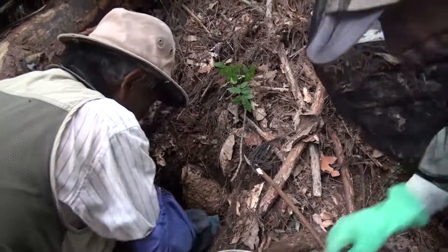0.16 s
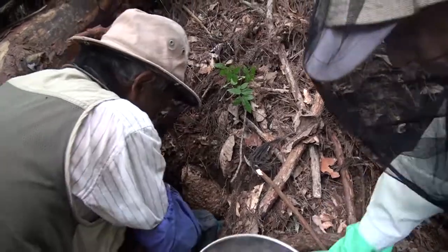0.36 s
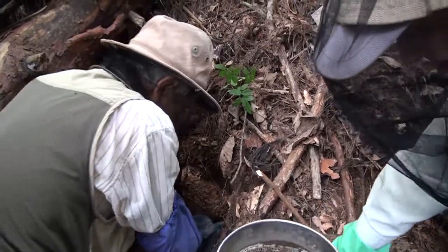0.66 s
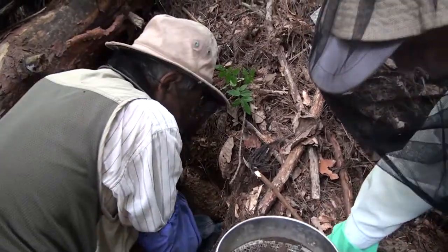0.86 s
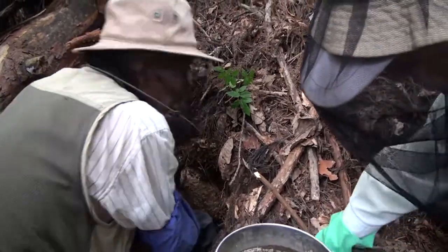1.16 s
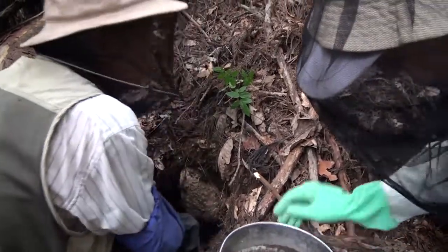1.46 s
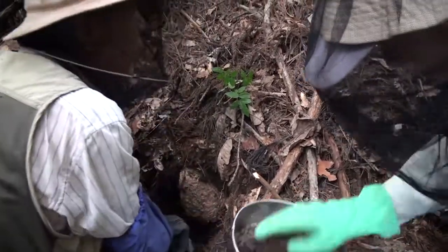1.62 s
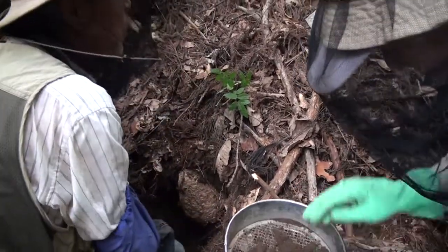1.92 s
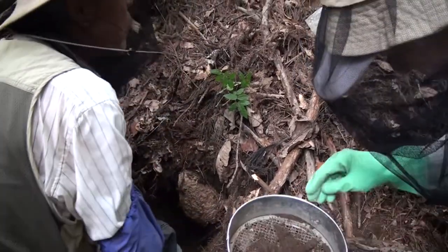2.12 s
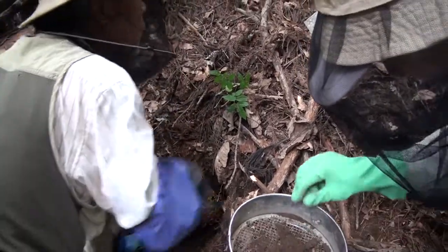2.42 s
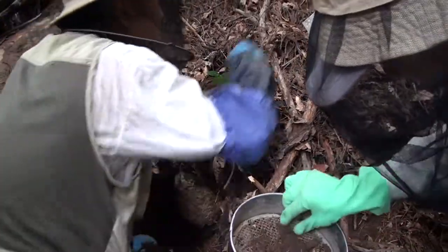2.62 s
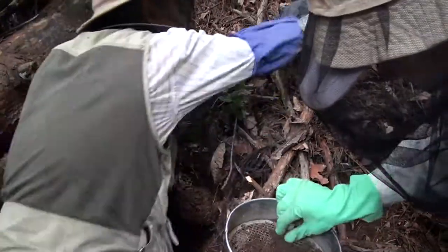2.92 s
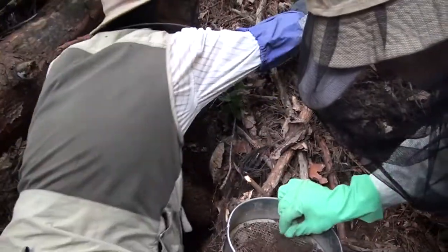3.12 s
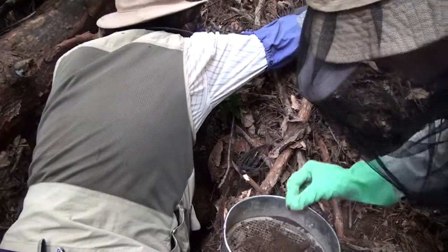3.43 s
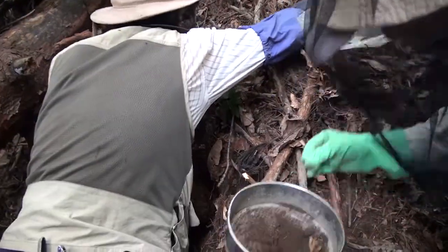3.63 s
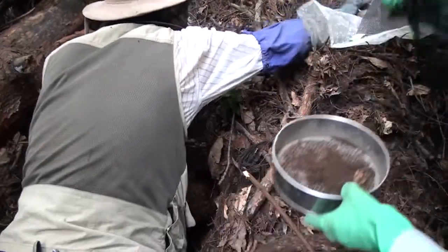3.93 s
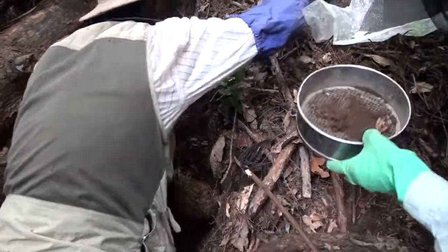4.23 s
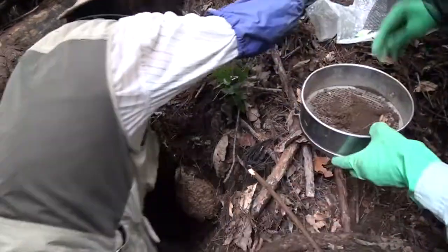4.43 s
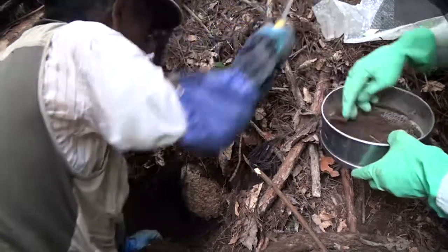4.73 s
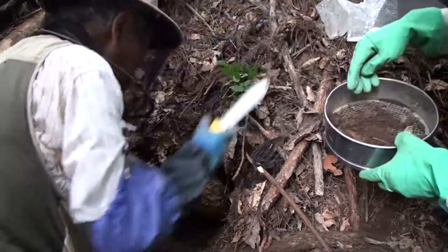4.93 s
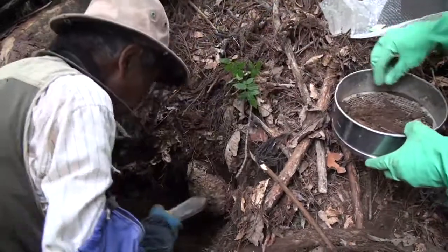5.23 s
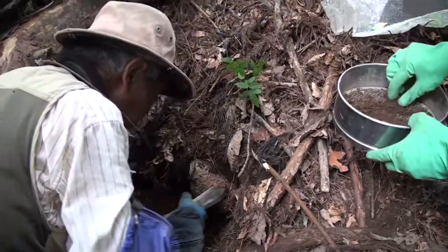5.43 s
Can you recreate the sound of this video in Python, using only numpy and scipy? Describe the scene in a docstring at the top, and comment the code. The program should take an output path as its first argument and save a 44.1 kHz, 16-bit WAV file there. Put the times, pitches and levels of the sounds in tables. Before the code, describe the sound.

A close outdoor scene of soil being sifted in a forest, over a soft steady rush and a very faint low drone. At about 0.2 s a metal sieve is knocked with a short bright clank, and more rattling knocks follow at 0.3-0.4 s. Dense, gritty soil hisses and crackles over the mesh, strongest around 0.3-0.7 s, with sharp twig and leaf snaps, thinning by 1.2 s. Dry sticks tock at 1.3 and 1.6 s. A second spill of grit swells from 1.7 to 2.3 s, with scattered snaps. From 2.5 to 3.8 s it is quieter: light sifting, sleeve rustle, dull clod pats. A brushing stroke comes near 3.9 s, faint rubs at 4.0-4.5 s. Around 4.6-4.8 s, litter rustles, a damped blade taps, a low thud lands and the sieve clinks. Grit trickles on, with a last stick tock at 5.3 s.

```python
"""Dry leaf litter on a forest floor, worked close to the microphone under a steady soft rush and a low far drone.
Noise bursts and ringing modes knock a metal sieve early on; dense random grains hiss as gritty soil on its mesh.
Filtered bursts snap twigs and leaves and grains rustle as sleeves throughout; dry sticks tock and clods pat down.
Late on, narrow noise rasps as rubs, a damped blade taps, a sinking sine thuds and the sieve clinks again.
"""
import sys
import numpy as np
from scipy import signal
from scipy.fft import rfft, irfft, next_fast_len
from scipy.io import wavfile
from scipy.ndimage import map_coordinates

SR = 44100
rng = np.random.default_rng(int(sys.argv[2]) if len(sys.argv) > 2 else 0)


def put_to_file(sound):
    """Save the sound as 16-bit audio at rate SR, in the file named by the first command-line argument."""
    columns = np.atleast_2d(sound).T  # one column per channel
    safe = np.clip(columns, -1, 1)
    whole_steps = np.round(safe * 32767)
    wavfile.write(sys.argv[1], SR, whole_steps.astype(np.int16))


N = 245328


def amp(db):
    """Decibels to gain."""
    return 10 ** (np.asarray(db) / 20)


def unit(x):
    """Scale to rms 1."""
    return x / np.sqrt(np.mean(x ** 2) + 1e-20)


def curves(rows):
    """One value per sample for each column after the time."""
    s, *cols = np.transpose(rows)
    return [np.interp(np.arange(N) / SR, s, c) for c in cols]


def wobble(rate):
    """A smooth random curve, rate knots a second."""
    knots = rng.standard_normal(int(N * rate / SR) + 4)
    return map_coordinates(knots, [np.arange(N) * rate / SR])


def coloured(x, points):
    """x through a causal minimum-phase filter whose gain follows the (frequency [Hz], gain [dB]) points."""
    size = 2 * next_fast_len(x.shape[-1] // 2 + 2048)
    hz, db = np.transpose(points)
    bins_hz = np.fft.rfftfreq(size, 1 / SR) + 1
    gain_db = np.interp(np.log(bins_hz), np.log(hz), db)
    cepstrum = irfft(np.log(amp(gain_db)))
    # folding the cepstrum forward makes the filter causal
    cepstrum[1:size // 2] *= 2
    cepstrum[size // 2 + 1:] = 0
    return irfft(rfft(x, size) * np.exp(rfft(cepstrum)), size)[..., :x.shape[-1]]


def resonant(x, hz, q):
    """x through one resonance."""
    hz = min(hz, SR / 3)
    return signal.lfilter(*signal.iirpeak(hz, max(q, 3 * hz / SR), SR), x)


def add(track, s, x):
    """Mix x into the track from time s."""
    part = track[max(round(s * SR), 0):][:len(x)]
    part += x[:len(part)]


def swell(s, width):
    """A smooth bell-shaped rise and fall around time s."""
    return np.exp(-((np.arange(N) / SR - s) / width) ** 2 / 2)


def movement(start, rise, hold, release):
    """Gain of one hand movement: it gathers force, sags slowly while it lasts, then dies away."""
    sag_db_per_s = 6.5
    t = np.arange(N) / SR - start
    sag_db = sag_db_per_s * np.clip(t - rise, 0, hold)
    release_db = 60 * np.maximum(t - rise - hold, 0) / release
    return np.clip(t / rise, 0, 1) * amp(-sag_db - release_db)


def grains(rate, spread_db, life):
    """Tiny random impacts, rate a second, of uneven strength: each is a noise burst that falls 60 dB in its life."""
    sizes = amp(spread_db * np.minimum(rng.exponential(size=N), 4))
    impacts = (rng.random(N) < rate / SR) * sizes ** 2
    energy = signal.lfilter([1], [1, -amp(-120 / (life * SR))], impacts / rate)
    return unit(np.sqrt(energy) * rng.standard_normal(N))


def ticks(rate, centre_hz, cycles, spread_db):
    """Crumbs or leaf flakes, rate a second: each rings for a few cycles at a pitch of its own."""
    chance = rng.random((int(rate * N / SR), 4))
    t = np.arange(SR // 100) / SR
    hz = centre_hz * 2 ** (chance[:, :1] - chance[:, 3:])  # within an octave either way
    size = amp(spread_db * np.minimum(-np.log(1 - chance[:, 1:2]), 3.5))
    rings = size * np.sin(2 * np.pi * hz * t) * amp(-60 * hz * t / cycles)
    places = (chance[:, 2:3] * N).astype(int) + np.arange(len(t))
    return unit(np.bincount(places.ravel(), rings.ravel(), N)[:N])


def forest():
    """A soft steady rush with a low, uneven drone far off; its middle range is slightly wide."""
    # tone of the forest air: (frequency [Hz], relative gain [dB])
    air_tone = [(20, -29), (45, -22), (80, -14), (120, -5.5), (180, -4), (340, -3.5), (530, -6.5),
                (1100, -7.5), (1900, -9), (3000, -13.5), (6900, -15.5), (9000, -15), (11800, -18.5),
                (13000, -61)]
    side_tone = [(60, -30), (300, 1.0), (700, 1.0), (1200, 0.0), (2000, -5.5), (4000, -7.0), (10000, -56.0)]
    air = unit(coloured(rng.standard_normal(N), air_tone))
    drone = unit(resonant(resonant(rng.standard_normal(N), 123.0, q=7.4), 123.0, q=7.4))
    side = unit(coloured(rng.standard_normal(N), side_tone))
    left_right = np.array([[1], [-1]])
    return amp(-52.5) * air + amp(-69.0) * drone + amp(-63.5) * side * left_right


def rumble():
    """A faint low rumble, noise through a broad resonance, comes and goes."""
    # mean level of the rumble, ahead of its wobble: (time [s], level [dB])
    rumble_levels = [(0, -70), (.9, -75), (1.3, -66), (2.1, -70), (3.1, -64.5), (3.6, -69), (4.0, -62.5),
                     (4.7, -59), (5.5, -68)]
    level_db, = curves(rumble_levels)
    low_noise = unit(resonant(resonant(rng.standard_normal(N), 70, q=1.9), 70, q=1.9))
    return amp(level_db + 2 * wobble(11)) * low_noise


def ground_echo(x, t60):
    """Trunks and ground scatter a short answer from the sides, opposite in the two channels."""
    tone = [(100, -11.0), (500, -12.0), (2200, 25.5), (4500, 16), (8500, 5), (12000, -18)]
    t = np.arange(SR // 4) / SR
    tail = coloured(rng.standard_normal(len(t)) * amp(-60 * t / t60), tone)
    left_right = np.array([[1], [-1]])
    return signal.fftconvolve(x, tail / np.linalg.norm(tail))[:N] * left_right


def clods():
    """A lump of earth lands on soft ground with a dull, toneless pat of noise."""
    # clods dropping: (time [s], starting level [dB], t60 [s])
    drops = [(0.553, -43, .06), (2.24, -48.5, 0.11), (2.905, -49, 0.046), (3.062, -45, .05),
             (3.22, -46, 0.052), (3.41, -47, 0.055), (3.4856, -43, 0.039), (3.712, -46, .05),
             (3.992, -42, .06)]
    tone = [(100, -21), (330, 3), (800, -4), (1600, -7), (4000, -40)]
    out, t = np.zeros(N), np.arange(SR // 10) / SR
    for s, db, t60 in drops:
        pat = unit(coloured(rng.standard_normal(len(t)), tone))
        add(out, s, amp(db - 60 * t / t60) * pat)
    return out


def bump():
    """A weight settles on the soft ground: a thud whose pitch sinks."""
    pitch_hz = np.interp(np.arange(N) / SR, [4.675, 4.72], [148, 108])
    thud = np.sin(2 * np.pi * np.cumsum(pitch_hz) / SR)
    return amp(-34.0) * swell(4.695, 0.016) * thud


def rubs():
    """Sliding contacts of blade, gloves and sleeves give short, narrow rasps of noise."""
    # brief rubs: (time of the peak [s], level [dB], centre [Hz], width of the bell [s])
    contacts = [(4, -57, 980, 0.012), (4.27, -58, 230, 0.054), (4.38, -56, 314, 0.052),
                (4.4, -55, 1000, 0.012), (4.495, -53, 213, 0.01)]
    out = np.zeros(N)
    for s, db, hz, width in contacts:
        rasp = unit(resonant(resonant(rng.standard_normal(N), hz, q=8.9), hz, q=8.7))
        out += amp(db) * swell(s, width) * rasp
    return out


def sticks():
    """A dry stick gives a hollow tock: a sharp crack with two quickly damped bending modes."""
    # knocks of dry sticks:
    # (time [s], level [dB], lower mode [Hz], upper mode [Hz], upper over lower mode [dB], t60 of the modes [s])
    tocks = [(1.3385, -38.5, 1540, 2720, 1, .022), (1.5891, -36, 2250, 2960, 2, 0.028),
             (5.2957, -36.5, 1730, 2850, 0.5, 0.032)]
    crack_tone = [(200, -10), (750, -3), (1400, -8), (3500, 0), (6000, -8), (12000, -20)]
    out, t = np.zeros(N), np.arange(SR // 12) / SR
    for s, db, low_hz, high_hz, high_db, t60 in tocks:
        modes = np.sin(2 * np.pi * low_hz * t) + amp(high_db) * np.sin(2 * np.pi * high_hz * t)
        crack = unit(coloured(rng.standard_normal(len(t)), crack_tone))
        tock = modes * amp(-60 * t / t60) + amp(1 - 60 * t / 0.021) * crack
        add(out, s, amp(db) * tock)
    return out


def snaps():
    """A brittle break: a thin click, a short splintering with a damped ping, and the knock of the twig's body."""
    # snapping twigs, leaves and pebbles:
    # (time [s], level [dB], centre [Hz], woody body ahead of a 2 dB cut [dB], t60 [s])
    breaks = [(0.292, -31.5, 8900, -6, 0.024), (0.3502, -33, 6450, 1, 0.034),
              (0.3567, -30, 6100, -5, 0.015), (0.3817, -29, 8200, -16, .01),
              (0.4083, -29.5, 5600, -10, 0.014), (0.4168, -32, 6000, -12, .015),
              (0.4385, -21.5, 7140, -10, 0.02), (0.4533, -29, 8500, -17, 0.023),
              (0.5972, -34, 7500, -20, .006), (0.6172, -31, 7000, -20, .008), (0.6537, -33, 5870, -6, .02),
              (0.6828, -39, 7300, -14, .015), (0.6895, -29, 6700, -18, 0.0068),
              (0.7309, -34, 8600, -24, .008), (0.7472, -39, 7700, -20, .008),
              (0.7766, -37, 6700, -5, 0.015), (0.8416, -32, 6060, -8.5, 0.044),
              (0.8641, -38, 5900, -22, .01), (0.8742, -33.5, 7260, -21, .012), (0.891, -32, 8800, -7, .014),
              (0.9252, -35, 7700, -24, 0.019), (0.9752, -37, 6300, -19, .015),
              (0.9176, -38.5, 7500, -20, .008), (0.9415, -38, 8400, -6, .015),
              (0.9979, -40, 6600, -22, 0.0073), (1.161, -40, 7250, -9, 0.0088),
              (1.335, -44, 7040, -9, 0.046), (1.3427, -41.5, 7600, -12, 0.028),
              (1.3565, -38.5, 1730, -10, 0.012), (1.370, -42, 8800, -26, .018),
              (1.578, -44, 8550, -10, 0.074), (1.5892, -40, 8300, -13, 0.03),
              (1.707, -36, 8100, -18, 0.033), (1.7844, -43, 9000, -20, .015),
              (1.8447, -38, 8750, -22, .036), (1.9522, -29.5, 8900, -24, .008),
              (2.126, -30.5, 6820, -29, 0.008), (2.1712, -32, 7000, -18, .01),
              (2.197, -30, 7300, -20, .008), (2.2284, -33, 7660, -19, .008),
              (2.249, -38.5, 4500, -1.5, .01), (2.2572, -34, 6630, -18, 0.014),
              (2.369, -41, 5500, -15.5, .01), (2.386, -39, 5830, -21, 0.0091),
              (2.341, -37, 6400, -20, .008), (2.4685, -43, 6800, -19, .01), (2.5073, -44, 6600, -20, .008),
              (2.6245, -37, 7700, -20, .01), (2.7287, -45, 7840, -18, .008),
              (2.8736, -41, 9600, -22, 0.0069), (2.9753, -36.5, 9300, -18, 0.017),
              (2.3485, -36, 5840, -14, 0.016), (2.3964, -35.5, 7900, -13, 0.0065),
              (2.6168, -41, 7900, -21, 0.03), (2.8155, -42, 7000, -20, .01),
              (2.822, -32.5, 8700, -20, 0.044), (2.9585, -39, 6940, -24, 0.023),
              (3.0168, -33.5, 7300, -27, 0.011), (3.1283, -40, 7540, -10, .04),
              (3.2673, -31, 6650, -14.5, .012), (3.279, -35, 6060, -28, 0.022), (3.3353, -37, 4500, 1, .01),
              (3.3592, -37.5, 8700, -27, 0.037), (3.5344, -33.5, 9740, -28, 0.072),
              (3.5612, -45.5, 1800, -3, 0.015), (3.5998, -37.5, 5500, -8, 0.025),
              (3.697, -47, 1700, -1, 0.022), (3.714, -45.5, 3070, 2, 0.019), (3.8977, -40, 6000, -12, .015),
              (3.917, -40, 6500, -18, .006), (3.9985, -49, 6000, -10, .006),
              (4.0685, -40, 5000, -14, 0.016), (4.091, -36, 4600, -20, 0.012),
              (4.4395, -41, 6200, -13, 0.1), (4.641, -39, 6300, -4, .03), (4.686, -34.5, 4200, -13, 0.033),
              (4.7583, -45, 5300, -12, .008), (4.8835, -41, 6500, 0, .008),
              (4.9303, -36.5, 8800, -22, .008), (4.953, -46, 6600, -20, .008),
              (5.0921, -34, 8400, -22, .008), (5.1312, -36, 7400, -22, .008),
              (5.2598, -32.5, 5370, -32, 0.012), (5.2712, -38, 5000, -25, .01),
              (5.2965, -41.5, 8800, -13, .03), (5.3614, -43, 5300, -21, .012)]
    click_tone = [(1500, -18.5), (4500, -4.5), (9500, 1), (14000, -15)]
    body_tone = [(200, -18), (800, 4), (1800, 15.5), (3000, -2), (6000, -21.0)]
    out, t = np.zeros(N), np.arange(SR // 12) / SR
    attack = t < .003  # each noise part is levelled by its first 3 ms
    for s, db, hz, body_db, t60 in breaks:
        burst = rng.standard_normal(len(t)) * (amp(-60 * t / 0.0015) + amp(-2.0 - 60 * t / t60))
        crack = coloured(resonant(burst, hz, q=2.54), [(hz / 4, -18), (hz / 1.4, 0)])
        crack = coloured(crack, [(10000, 0), (13000, -11.0)])  # damp wood dulls the very top
        click = coloured(rng.standard_normal(len(t)) * amp(-60 * t / .0015), click_tone)
        ping = np.sin(2 * np.pi * hz * t) * amp(-6.5 - 60 * t / t60)
        body = coloured(burst, body_tone)
        snap = crack / crack[attack].std() + ping
        snap += amp(-11.0) * click / click[attack].std()
        snap += amp(body_db - 2.0) * body / body[attack].std()
        add(out, s, amp(db) * snap)
    return out


def brushing():
    """Sleeves and gloves crush the dry litter into grains and ticks and shift the soft earth."""
    # strokes of arms and sleeves through the litter:
    # (start [s], rise [s], hold [s], release t60 [s], rustle level [dB], soft earth level [dB])
    strokes = [(0.266, 0.06, 0.016, 0.38, -35.5, -45.5), (0.416, 0.12, .01, 0.34, -40.5, -61),
               (0.604, 0.14, 0.21, 0.22, -48.5, -57), (1.288, 0.056, .01, 0.12, -55, -51),
               (1.691, 0.018, .005, 0.22, -43, -68), (1.725, 0.028, .005, 0.48, -45.5, -52),
               (1.9, 0.077, .01, 0.87, -46.5, -60), (2.2, 0.34, 0.1, .5, -55.5, -61),
               (2.718, 0.03, 0.064, 0.25, -52.5, -58), (2.885, 0.02, 0.01, 0.32, -48.5, -61),
               (2.968, 0.052, 0.37, 0.52, -53.5, -64), (3.836, 0.088, .02, 0.78, -44.5, -50.5),
               (3.952, 0.038, .01, 0.66, -64, -49.5), (4.047, 0.17, 0.6, 0.45, -55, -56.5),
               (4.56, 0.057, .005, 0.22, -42.5, -50), (4.653, 0.024, 0.0089, 0.99, -43, -47.5),
               (4.74, 0.13, 0.15, 0.67, -51, -53)]
    # tone of the dry litter: (frequency [Hz], relative gain [dB])
    litter_tone = [(300, -21.5), (800, 1), (1200, -4.5), (1900, 3.5), (2700, -6.5), (4000, -1), (7000, -10),
                   (12000, -29)]
    # tone of the soft earth: (frequency [Hz], relative gain [dB])
    earth_tone = [(60, -26), (130, -2.5), (200, -3), (330, -2.5), (480, 1.5), (700, -1), (1100, -12),
                  (2500, -39)]
    powers = np.zeros((2, N))
    for *timing, rustle_db, earth_db in strokes:
        powers += np.outer(amp([rustle_db, earth_db]), movement(*timing)) ** 2
    rustle_gain, earth_gain = np.sqrt(powers + amp(-65) ** 2)  # the hands are never quite still
    crackle = ticks(rate=150, centre_hz=2760, cycles=11, spread_db=3.0)
    leaves = unit(coloured(grains(800, spread_db=1.5, life=0.0029), litter_tone))
    rustle = unit(leaves + amp(-4.0) * crackle)
    earth = unit(coloured(grains(500, spread_db=2.5, life=0.023), earth_tone))
    return rustle_gain * rustle + earth_gain * earth * amp(1.5 * wobble(25.01))


def blade():
    """Each tap rings the blade briefly; the point of contact decides which modes answer most."""
    # taps as the blade is dragged and lifted:
    # (time [s], level [dB], most excited frequency [Hz], fall away from it [dB per octave])
    taps = [(4.5823, -38, 1400, 16), (4.592, -38, 1330, 30), (4.6087, -35, 1330, 40),
            (4.6215, -33.5, 1650, 16), (4.789, -27, 4200, 6), (4.795, -27.5, 1960, 45)]
    # modes of the blade, damped by the hand: (frequency [Hz], relative level [dB], t60 [s])
    blade_modes = [(1283, -1, 0.062), (1360, -3, 0.08), (1790, 1, 0.037), (1958, -3.5, 0.11),
                   (3600, -1, 0.037), (3900, -11, 0.18), (6050, -6, .12), (8350, 0, .09)]
    out, t = np.zeros(N), np.arange(SR // 6) / SR
    for s, tap_db, centre_hz, fall_db in taps:
        ring = np.zeros(len(t))
        for hz, db, t60 in blade_modes:
            mode_db = db - fall_db * abs(np.log2(hz / centre_hz))
            ring += amp(mode_db - 60 * t / t60) * np.sin(2 * np.pi * (hz * t + rng.random()))
        add(out, s, amp(tap_db) * ring * (1 - np.exp(-t / 0.00072)))
    return out


def sieve():
    """Each knock is a short crash of the mesh, then the rim rings on in close, beating modes."""
    # knocks on metal: (time [s], crash level [dB], ring level [dB], ring brightness [dB per octave],
    # crash t60 [s], ring length as a share of the free ring [0-1])
    knocks = [(0.1758, -12.5, -29.5, 4, 0.017, 0.88), (0.3125, -46, -28, -15, 0.037, 0.4),
              (0.333, -25, -42, -12, 0.049, .3), (0.3387, -17.5, -46, -9, 0.014, .3),
              (0.3977, -31.5, -42, -12, 0.02, .3), (4.7897, -29.5, -37.5, -7, 0.037, 0.9),
              (4.8355, -38, -42, -2, 0.015, 0.8)]
    # modes of the sieve's rim and pan: (frequency [Hz], relative level [dB], free t60 [s])
    metal_modes = [(1820, -9, .08), (1897, -7.5, .14), (1935, -13, .26), (1974, -3.5, .44),
                   (2061, -11, .16), (3465, -7, .13), (3700, -6, .06), (3850, -4.5, .18), (4151, -3, .18),
                   (4190, -10, .14), (4299, -10, .13), (4416, -10, .13), (4495, -8, .13), (4748, -3, .1),
                   (5464, -10, .11), (5994, -8, .1), (6051, -7, .06), (6233, -8, .13), (6424, -8, .14),
                   (7955, -3, .09), (8240, -3, .09), (8350, -2, .06), (8436, -6, .09), (8540, -4, .07),
                   (8818, -7, .1), (9135, -6, .08), (9485, -9, .11), (10430, -11, .1)]
    # tone of the mesh's crowded high modes: (frequency [Hz], relative gain [dB])
    crash_tone = [(200, -28), (900, -18), (1400, -13.5), (1900, -1), (2700, -11.5), (4200, -4.5),
                  (6200, -6.5), (7200, -8), (8500, 3), (10000, -8), (12000, -13), (15000, -19)]
    ring_build_s = 0.0013  # the crash passes its energy on to the rim
    out, t = np.zeros(N), np.arange(SR // 3) / SR
    lowest_hz = metal_modes[0][0]
    for s, crash_db, ring_db, tilt_db, crash_t60, freedom in knocks:
        ring = np.zeros(len(t))
        for hz, db, t60 in metal_modes:
            # each knock excites every mode a little differently
            mode_db = db + tilt_db * np.log2(hz / lowest_hz) + rng.normal(0, 1)
            decay_db = 60 * t / (t60 * freedom)
            ring += amp(mode_db - decay_db) * np.sin(2 * np.pi * (hz * t + rng.random()))
        ring *= 1 - np.exp(-t / ring_build_s)
        fading = amp(-60 * t / crash_t60) + amp(-7.0 - 60 * t / 0.15)  # plus a weaker, longer tail
        crash = unit(coloured(rng.standard_normal(len(t)), crash_tone)) * fading
        add(out, s, amp(crash_db) * crash + amp(ring_db) * ring)
    return out


def soil():
    """Grit patters on the mesh: stronger flow is denser, fine grit brighter than coarse, and stray pebbles tick."""
    # spills of soil over the mesh: (start [s], rise [s], hold [s], release t60 [s],
    # flow strength, ahead of a 1.9 dB cut in the grit [dB], share of fine grit [dB])
    spills = [(0.065, 0.029, 0.057, .3, -53, -2.5), (0.27, 0.063, 0.037, 0.095, -28, -2.5),
              (0.393, 0.028, 0.065, .3, -35, -5), (0.453, 0.041, 0.061, 0.65, -26.5, -3.5),
              (0.565, 0.12, 0.027, 1.1, -33, -3.5), (0.79, 0.033, 0.12, 0.18, -41, -1),
              (1.047, 0.041, 0.094, 0.45, -51, -2.5), (1.698, 0.015, 0.0055, 0.15, -38.5, -2),
              (1.736, 0.037, .01, 0.34, -36.5, -2), (1.827, 0.11, 0.036, 1.48, -30, -1.5),
              (1.952, 0.17, 0.12, 0.37, -32.5, -5.5), (2.257, 0.057, 0.4, 2.1, -47.5, -2.5),
              (2.737, 0.14, 0.55, 0.32, -42.5, -2), (3.595, 0.044, .03, 1.4, -47.5, -4),
              (3.846, 0.065, 0.042, 1.17, -40, -11), (4.147, 0.22, 0.51, .4, -49.5, -5.5),
              (4.599, 0.02, 0.061, 0.31, -38, -2), (4.761, 0.058, .02, 0.95, -37, -2.5),
              (4.88, 0.14, 0.11, 1.07, -38, -3), (5.28, .06, 0.052, .6, -50, -2.5)]
    # tone of all grit, ahead of the coarse and fine shaping: (frequency [Hz], relative gain [dB])
    grit_tone = [(500, -35), (900, -25), (1400, -12), (1900, -12), (2700, -10), (3400, -10.5), (4700, -1),
                 (6700, -0.5), (9500, 0.5), (10800, -3.5), (12300, -11.5), (14200, -18), (15000, -80)]
    coarse_tone = [(1500, 4.0), (4000, -1.5), (7300, 1.0), (9000, -5.0), (13000, -2.0)]
    fine_tone = [(3000, -7.0), (6800, -11), (8400, 0.0), (14000, -1.5)]
    moderate_flow_db = -42
    pebble_db, pebble_growth = -57, 0.73  # level in a moderate flow; dB gained per dB of flow

    powers = np.array([(amp(db) * movement(*timing)) ** 2 for *timing, db, _ in spills])
    flow = powers.sum(axis=0) + amp(-79) ** 2  # a trickle never stops
    flow_db = 10 * np.log10(flow)
    extra_db = flow_db - moderate_flow_db
    rate = 1800 * amp(.8 * extra_db)  # grains a second
    spill_fine_share = amp([row[-1] for row in spills]) ** 2
    fine_share = np.clip(spill_fine_share @ powers / flow, .05, .9)

    coarse = coloured(coloured(grains(rate, spread_db=2.5, life=0.0028), grit_tone), coarse_tone)
    crumbs = ticks(rate=480, centre_hz=6400, cycles=25, spread_db=3.5)
    fine = coloured(coloured(grains(rate, spread_db=2.0, life=0.0035), grit_tone), fine_tone)
    coarse_and_crumbs = unit(unit(coarse) + amp(-5.0) * crumbs)
    grit = np.sqrt(1 - fine_share) * coarse_and_crumbs + np.sqrt(fine_share) * unit(fine)
    pebbles = unit(resonant(grains(30, spread_db=-0.5, life=0.022), 5700, q=5.7))
    grit_gain = amp(flow_db - 1.9 + 1.4 * wobble(140))
    return grit_gain * grit + amp(pebble_db + pebble_growth * extra_db) * pebbles


def scene():
    """All the work happens straight ahead; knocks and rustles carry to the surroundings, the soil's hiss stays close."""
    handling = brushing() + sieve() + blade() + snaps() + sticks() + clods() + rubs() + bump()
    echo = amp(-28.0) * ground_echo(handling, t60=0.035)
    return soil() + handling + echo + forest() + rumble()


def record(dry):
    """The microphone's channel falls away very steeply above its band limit."""
    top_hz = 14800
    size = next_fast_len(N + SR // 4)
    hz = np.fft.rfftfreq(size, 1 / SR)
    return irfft(rfft(dry, size) / (1 + (hz / top_hz) ** 80), size)[:, :N]


dry = scene()
out = record(dry)
put_to_file(out)
```